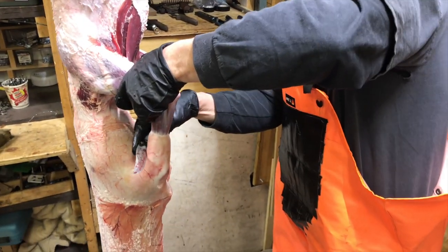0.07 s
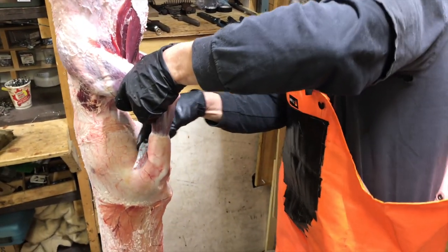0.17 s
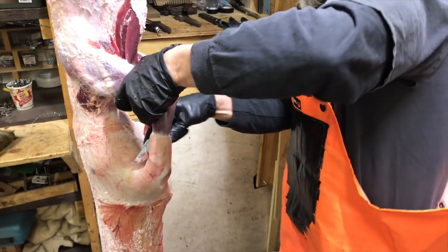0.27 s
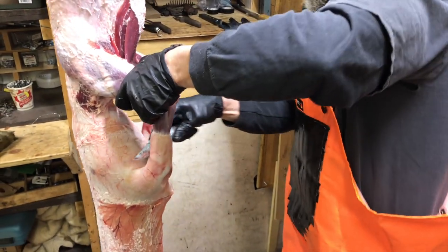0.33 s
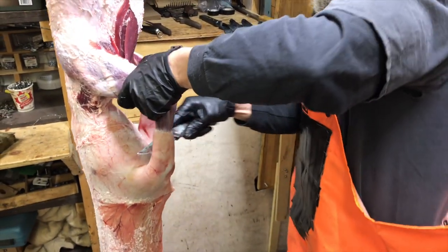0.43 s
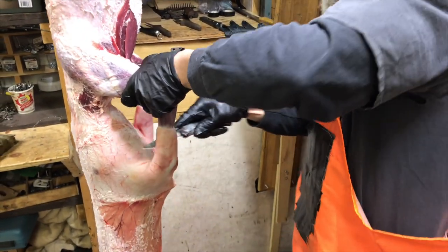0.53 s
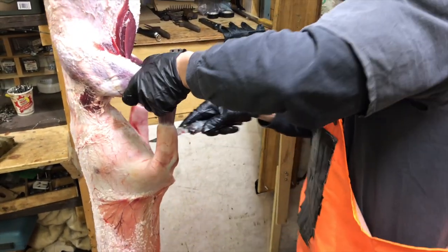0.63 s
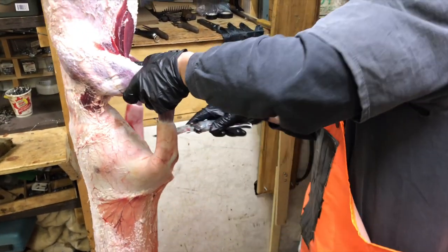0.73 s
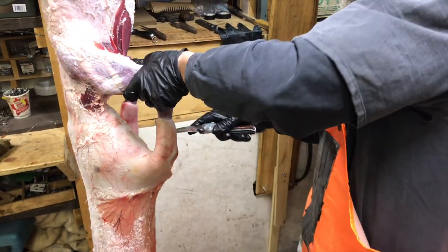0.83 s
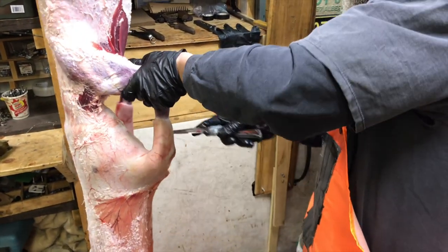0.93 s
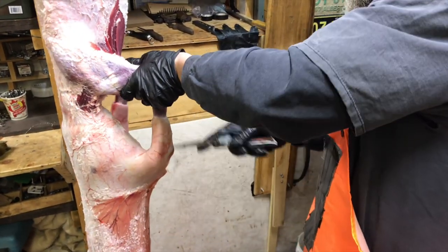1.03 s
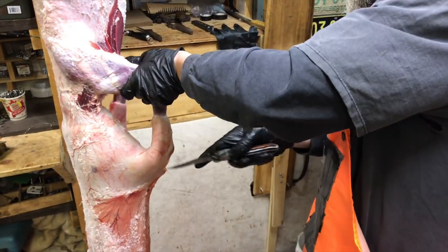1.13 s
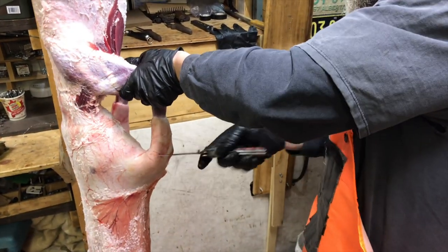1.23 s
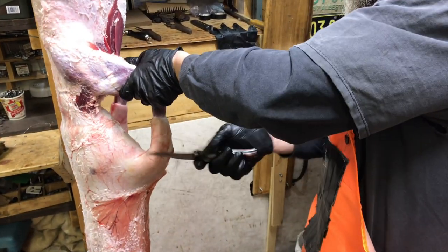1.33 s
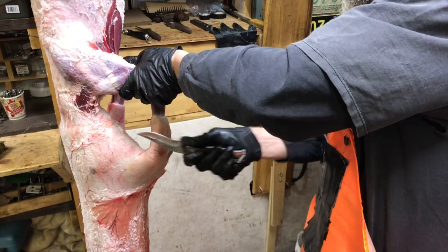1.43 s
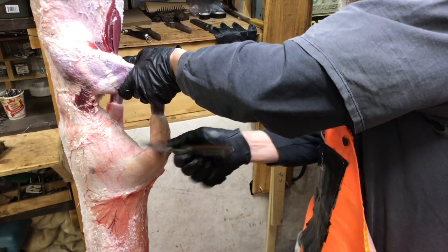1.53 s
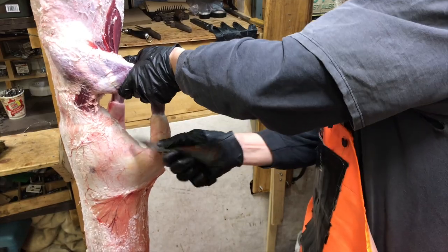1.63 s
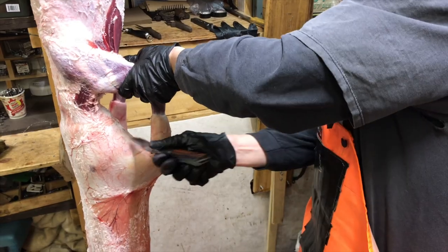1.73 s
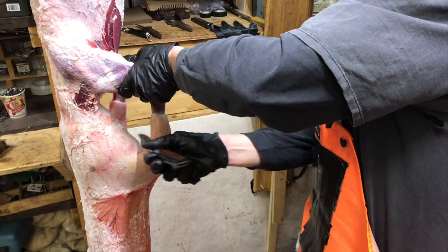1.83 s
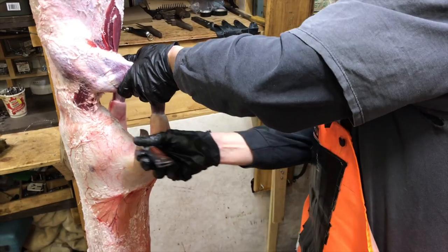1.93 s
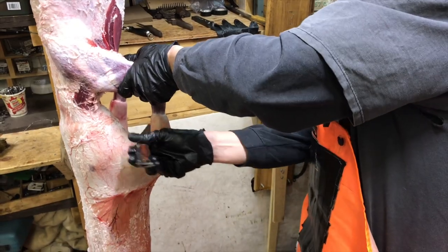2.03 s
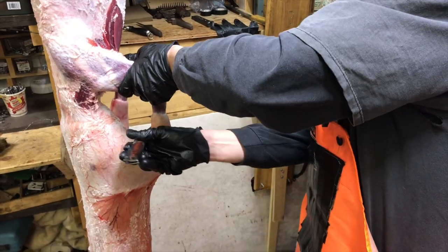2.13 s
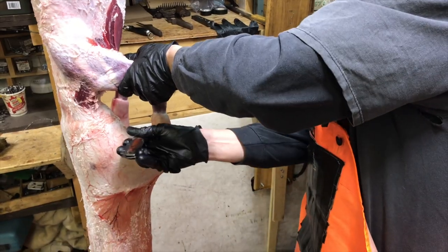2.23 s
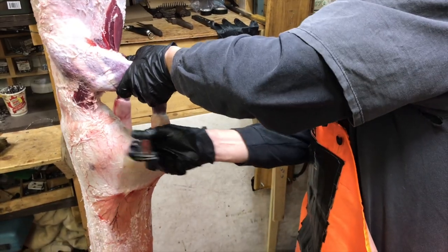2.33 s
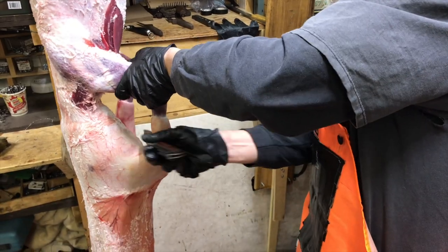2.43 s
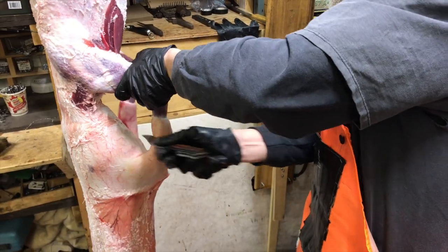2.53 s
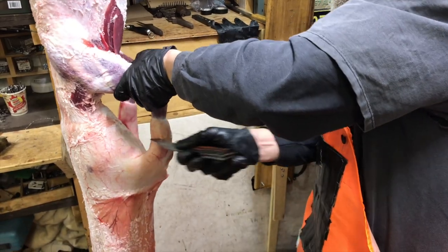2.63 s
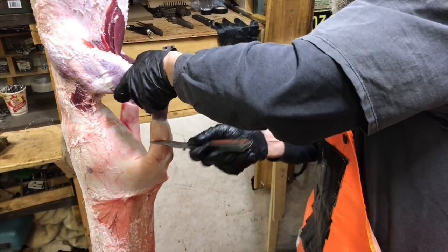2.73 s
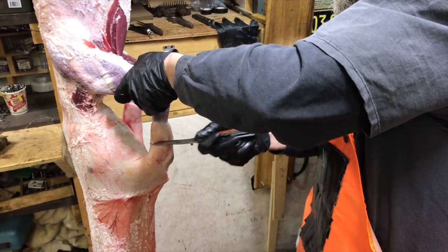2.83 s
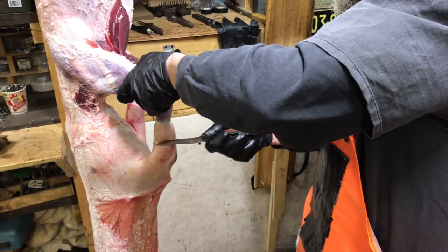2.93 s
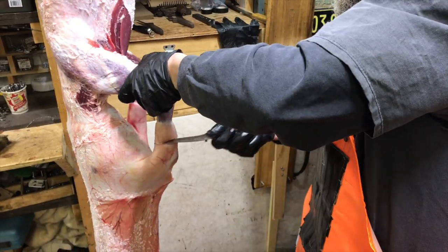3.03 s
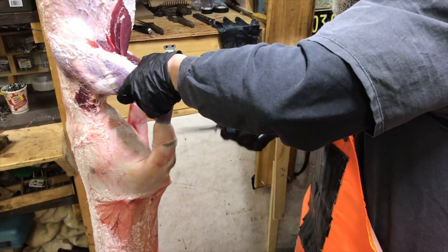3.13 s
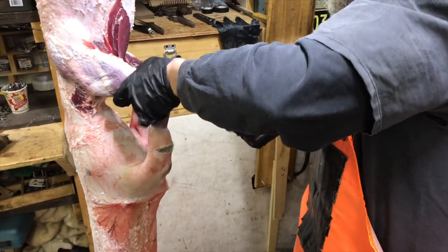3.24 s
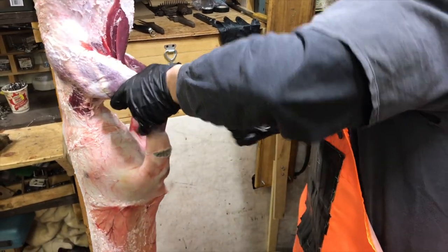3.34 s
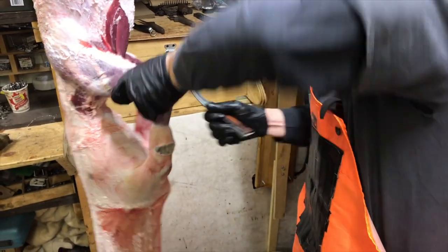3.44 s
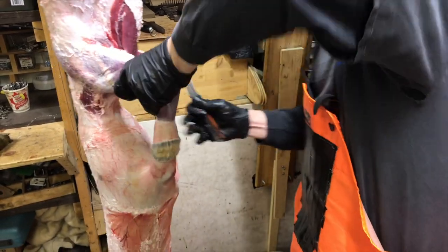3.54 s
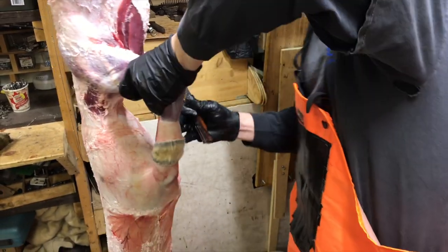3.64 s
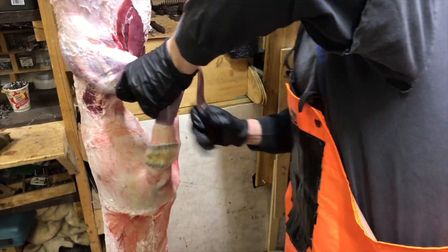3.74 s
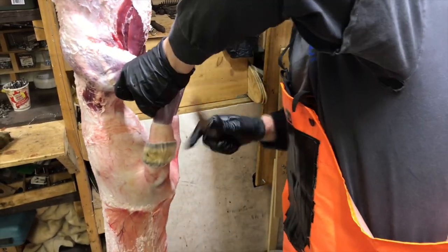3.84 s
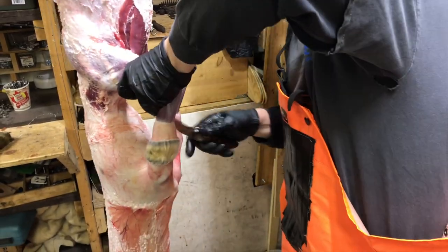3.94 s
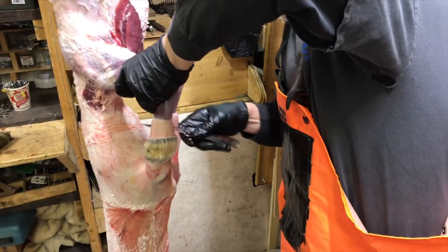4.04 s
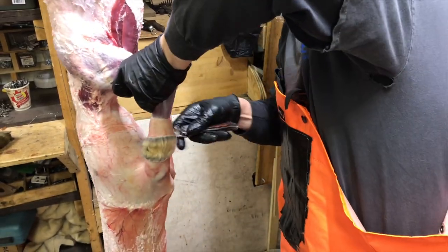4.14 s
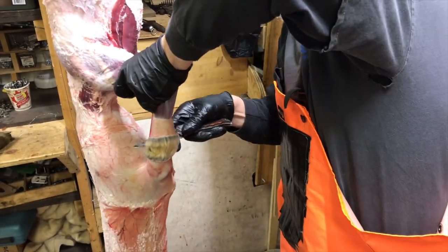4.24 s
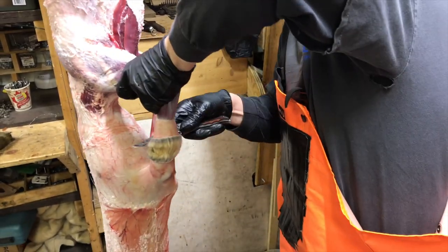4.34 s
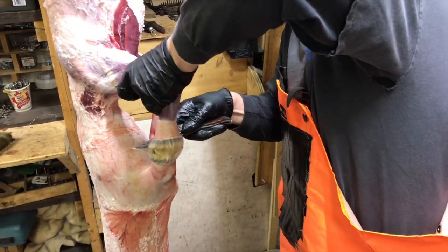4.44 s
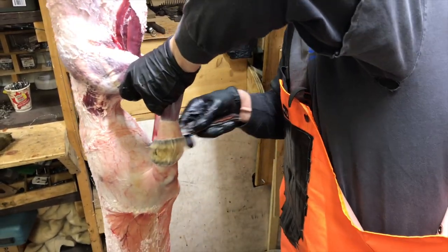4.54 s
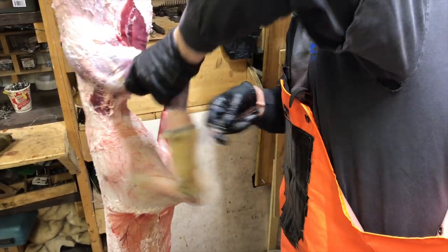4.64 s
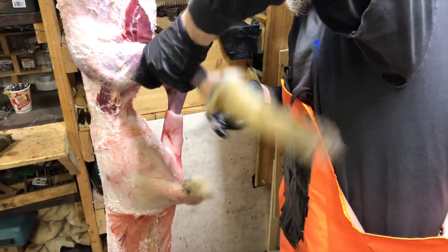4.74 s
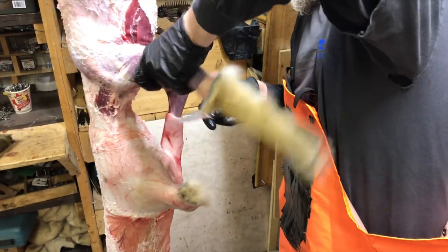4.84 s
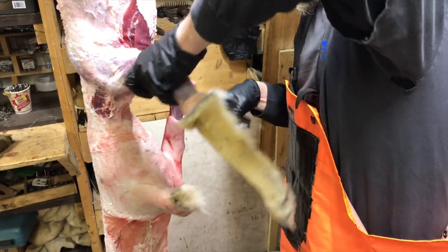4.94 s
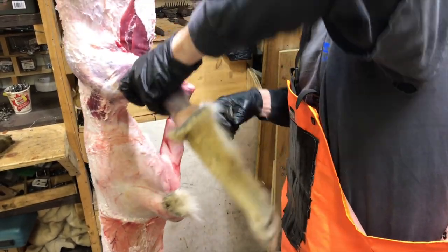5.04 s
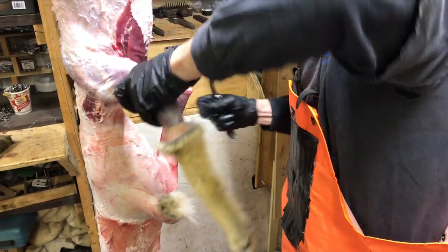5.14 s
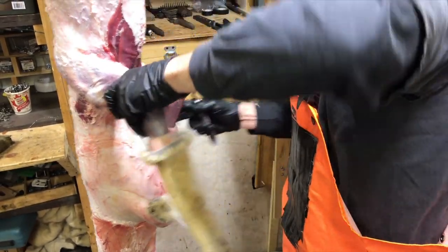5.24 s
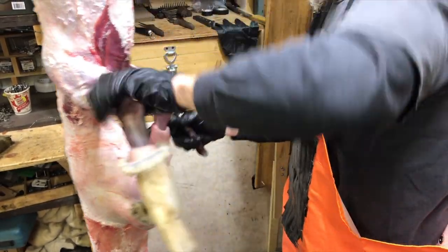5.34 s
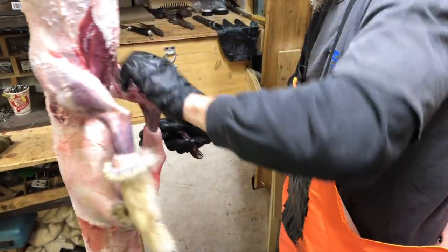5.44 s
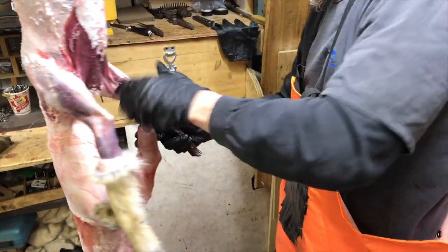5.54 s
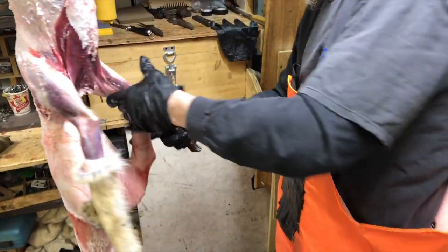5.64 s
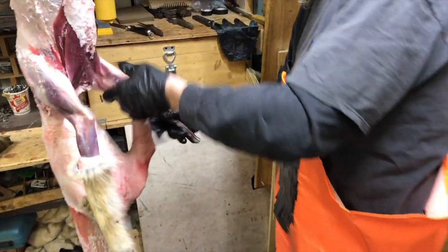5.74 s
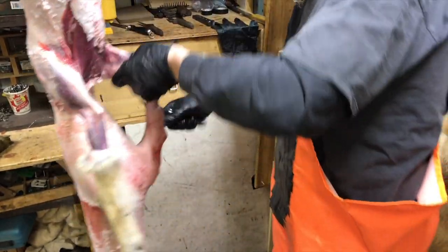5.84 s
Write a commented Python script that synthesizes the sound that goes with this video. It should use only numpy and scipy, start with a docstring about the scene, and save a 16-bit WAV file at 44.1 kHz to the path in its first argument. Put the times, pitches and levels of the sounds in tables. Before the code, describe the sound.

Close view of a hanging carcass being worked in a small workshop. A dull soft crack comes early, then quiet glove slips and faint wet cuts. A short tearing rasp leads to a hard bone snap past the middle, and a second, louder snap follows about a second later with soft meaty thuds. Sleeves rustle to the end over a low hum.

```python
"""In a small workshop with a humming appliance, a hanging carcass has its lower leg cut off at the joint.
The bent joint cracks as damped bone modes and the meat thuds in low, softly pushed modes.
Parting hide and sinew are wet clicks and bursts of coloured grains; the blade sings in narrow-band noise.
Sleeves and gloves rustle as shaped noise. Echoes and a short tail surround the work; the hum stays dry."""
import sys
import numpy as np
from scipy import signal
from scipy.fft import next_fast_len
from scipy.io import wavfile
from scipy.ndimage import uniform_filter1d

SR = 44100
rng = np.random.default_rng(int(sys.argv[2]) if len(sys.argv) > 2 else 0)


def persist_wave(psi):
    """Save psi, clipped to +-1, as 16-bit WAV."""
    counts = np.round(np.clip(psi, -1, 1) * 32767).astype(np.int16)
    wavfile.write(sys.argv[1], SR, np.atleast_2d(counts).T)


N = 259111
T = np.arange(N) / SR

# Joint cracks. Each row: start in seconds, level in dB, snap pitch in Hz, snap rise in seconds,
# leg ring in dB re snap, leg tilt in dB per octave, splinter in dB re snap.
CRACK_EVENTS = [(0.3606, -45, 1520, 0.0028, 4.5, -2.5, -12), (3.4064, -22, 1980, 0.00039, -5, 2, -34),
                (3.4510, -28, 2430, 0.00011, -28, 10, -9), (3.4709, -39.5, 960, 0.00042, -12, -3.5, -16),
                (4.5248, -19, 2450, 0.00014, -7, 1.5, -36)]
# Modes of the leg. Each row: frequency in Hz, rise in seconds, level in dB before tilt.
LEG_MODES = [(278, 0.0018, 1), (375, 0.0018, -16), (678, 0.004, -9), (891, 0.0011, -4.5),
             (1360, 0.0015, -13), (1665, 0.00042, -4.5), (1975, 0.0016, -20), (3580, 0.0006, -15)]


def joint():
    """Each crack is a sharp snap plus the ring of bone, quickly damped by the meat round it."""
    out = np.zeros(N)
    pivot_hz = LEG_MODES[2][0]
    for start_s, level_db, snap_hz, rise_s, leg_db, tilt_db, splinter_db in CRACK_EVENTS:
        leg = 0
        for mode_hz, mode_rise_s, mode_db in LEG_MODES:
            tilted_db = mode_db + tilt_db * np.log2(mode_hz / pivot_hz)
            leg = leg + undb(tilted_db) * ring(mode_hz, mode_rise_s)
        snap = ring(snap_hz, rise_s)
        crack = snap + undb(leg_db) * leg + undb(splinter_db) * splinter(decay_s=0.0005)
        add(out, start_s, -undb(level_db) * crack)  # first push is downward
    return out


def splinter(decay_s):
    """A broad crackle: coloured noise falling by 1/e every decay_s."""
    t = T[:SR // 2]
    spectrum = [(600, -21), (2000, 16.0), (4000, -15), (7000, -5.0), (15000, -16)]  # Hz, dB
    return colour(rng.standard_normal(len(t)), spectrum) * np.exp(-t / decay_s)


# Sinews giving way, and the meat rebounding after. Each row: start in seconds, level in dB, pitch in Hz, swell
# in seconds, carcass sway in dB re thud, bone ring in dB re thud.
THUD_EVENTS = [(0.3616, -30, 193.5, 0.0078, -13.5, -19.5), (0.387, -43.5, 168, 0.014, 0, -7),
               (0.407, -47, 333, 0.0072, -9, -4), (3.562, -44, 170, 0.014, -0.5, -25),
               (3.793, -52, 129.3, 0.033, 1, -17), (4.426, -46, 137, 0.012, -9, -16),
               (4.444, -31, 195, 0.019, -29, -25), (4.525, -42.5, 220, 0.0088, 0, -33),
               (4.587, -34.5, 208, 0.0071, -20, -35)]


def meat(sway_hz=65, sway_rise_s=0.019, boom_db=-7, boom_rise_s=0.075, bone_hz=368, bone_rise_s=0.014):
    """Soft thuds as sinews give and the meat rebounds; each rings the long bone and shakes the carcass, which
    booms on faintly."""
    out = np.zeros(N)
    sway = ring(sway_hz, sway_rise_s, order=2) + undb(boom_db) * ring(sway_hz, boom_rise_s)
    bone = ring(bone_hz, bone_rise_s)
    for start_s, level_db, hz, swell_s, sway_db, bone_db in THUD_EVENTS:
        thud = ring(hz, swell_s, order=3)
        add(out, start_s, undb(level_db) * (thud + undb(sway_db) * sway + undb(bone_db) * bone))
    return out


# Fibres parting under the edge or tearing at the joint. Each row: time of full strength in seconds,
# build in seconds, hold in seconds, fade in seconds, rasp level in dB, fizz in dB re rasp, squelch in dB re rasp.
CUT_EVENTS = [(0.361, 0.00091, .003, 0.029, -59.5, -7, 6.5), (0.888, 0.0065, 0.016, .012, -57.5, -5, 1),
              (0.915, 0.0044, 0.012, 0.012, -54, -3, 2.5), (2.992, 0.019, 0.059, .01, -55, -5, -13),
              (3.053, 0.016, .011, 0.0034, -45.5, -19, -3), (3.407, 0.0036, .003, 0.015, -46.5, -11, 5.5),
              (3.45, .02, 0.016, 0.042, -59, -6, 0.5), (4.53, 0.011, 0.039, 0.023, -48.5, -1.5, -15)]
# Spectra of the coarse rasp, fine fizz and wet squelch. Each row: frequency in Hz, level in dB.
RASP_SPECTRUM = [(100, -10), (250, -3), (800, -7), (1300, -3.5), (1600, -4.5), (2100, -3), (3800, -6.5),
                 (5000, -11.5), (6300, -11.5), (8000, -24), (16000, -21)]
FIZZ_SPECTRUM = [(2000, -13), (4500, -6.5), (6300, -0.5), (7500, -2), (9000, 0.5), (10400, -6),
                 (11700, -2.5), (13500, -0.5), (15500, -2.5)]
SQUELCH_SPECTRUM = [(120, -19), (200, 4), (370, -1), (520, -8), (720, 1.5), (1000, 6), (1300, -2),
                    (2000, -10), (5000, -43)]


def cuts(snag_db=2.0, snag_hz=300):
    """Fibres part in dense grains, snagging on the way: coarse rasp, fine fizz on top, dull wet squelch below."""
    rasp = grains(RASP_SPECTRUM, spread_db=2.2)
    fizz = grains(FIZZ_SPECTRUM, spread_db=2.2)
    squelch = grains(SQUELCH_SPECTRUM, spread_db=2.2)
    power = np.zeros((3, N))
    for full_s, build_s, hold_s, fade_s, rasp_db, fizz_db, squelch_db in CUT_EVENTS:
        layer_db = rasp_db + np.array([[0], [fizz_db], [squelch_db]])
        power += (undb(layer_db) * surge(full_s, build_s, hold_s, fade_s)) ** 2
    coarse, fine, wet = np.sqrt(power)
    return undb(snag_db * walk(snag_hz)) * (coarse * rasp + fine * fizz + wet * squelch)


# Wet clicks of tissue and blade. Each row: start in seconds, level in dB, pitch in Hz, rise in seconds.
TICK_EVENTS = [(0.8830, -52, 2600, 0.0008), (0.9546, -52.5, 2330, 0.00087), (1.2591, -52, 2740, 0.0007),
               (2.3844, -51, 14500, 0.00064), (2.9676, -45.5, 1800, 0.00078), (3.3946, -37.5, 3650, .00015),
               (3.778, -51.5, 2870, 0.003), (3.8455, -52, 2760, 0.0011), (3.929, -54.5, 3600, 0.00092),
               (4.034, -56.5, 2880, 0.0029), (4.4280, -45, 4500, 0.00018), (4.6597, -51, 3000, 0.00033),
               (5.0286, -54.5, 1970, 0.0009)]


def ticks(skirt_db=16, narrowing=0.33, typical_rise_s=.001):
    """Single fibres and wet films let go as tiny gritty bursts; the slower the burst, the clearer its pitch."""
    out = np.zeros(N)
    t = T[:SR // 10]
    for start_s, level_db, hz, rise_s in TICK_EVENTS:
        skirt = skirt_db * (rise_s / typical_rise_s) ** narrowing  # dB down one octave off pitch
        spectrum = [(hz / 2, -skirt), (hz, 0), (hz * 2, -skirt), (hz * 4, -1.5 * skirt)]
        grit = colour(rng.standard_normal(len(t)), spectrum)
        envelope = t / rise_s * np.exp(1 - t / rise_s)
        add(out, start_s, undb(level_db) * grit * envelope)
    return out


# The edge dragging on gristle. Each row: middle in seconds, half length in seconds, level in dB.
DRAG_EVENTS = [(2.49, 0.058, -73), (3.059, .017, -64), (4.528, 0.013, -63)]
# Thin modes of the blade. Each row: frequency in Hz, mean level in dB.
BLADE_MODES = [(9570, -3.5), (11780, 1), (12780, -9)]


def blade(width_hz=150, wander_db=3, wander_hz=30):
    """Friction on gristle feeds the narrow modes of the steel, now one, now another."""
    friction = sum(undb(level_db) * swell(mid_s, half_s) for mid_s, half_s, level_db in DRAG_EVENTS)
    out = np.zeros(N)
    for hz, level_db in BLADE_MODES:
        b, a = signal.iirpeak(hz, hz / width_hz, fs=SR)
        mode = signal.lfilter(b, a, rng.standard_normal(N))
        out += undb(level_db + wander_db * walk(wander_hz)) * unit(mode)
    return friction * out


# Arm movements. Each row: time of full strength in seconds, hold in seconds, level in dB.
ARM_MOVES = [(0.016, .34, -72.5), (0.565, 0.51, -73), (1.093, .52, -69.5), (2.386, 0.18, -70),
             (3.12, 0.27, -72), (3.627, 0.36, -67), (4.46, 0.18, -65), (4.897, 0.31, -69.5),
             (5.228, 0.096, -63), (5.552, 0.26, -67.5)]
MOVE_ATTACK_S, MOVE_RELEASE_S = 0.033, 0.093
REST_DB, SLEEVE_SHEEN_DB = -81, 0.5  # rustle between movements; sheen re rustle
# Slips of glove and blade on the hide. Each row: middle in seconds, half length in seconds,
# level in dB, sheen in dB re level.
SLIP_EVENTS = [(1.188, 0.062, -61, -3), (1.295, 0.013, -67.5, 7), (1.401, 0.029, -62, 6.5),
               (1.475, 0.031, -62.5, 3), (1.593, 0.006, -59, -2), (1.647, 0.022, -61.5, -1),
               (3.164, 0.023, -64.5, -6), (3.388, 0.027, -65, 3), (3.686, 0.02, -64, 2),
               (3.769, 0.0083, -69.5, 16), (3.917, 0.057, -68.5, 9), (5.503, 0.023, -56, -3),
               (5.693, 0.019, -70.5, 10)]
# Spectra of the rub and its treble sheen. Each row: frequency in Hz, level in dB.
RUB_SPECTRUM = [(700, -27), (1500, -2), (2200, -2.5), (3700, 1), (4800, -5), (6600, -1.5), (8000, -8),
                (10000, -11), (16000, -19)]
SHEEN_SPECTRUM = [(5000, -57), (8000, -4.5), (9400, -3), (10400, -6), (11700, 1), (13500, -2.5), (15500, 1)]


def clothes(catch_db=1.25, catch_hz=90, drift_db=0.7, drift_hz=28, crinkle_db=-8):
    """Sleeves rustle as arms move, gloves slip in short strokes; both catch and give off tiny crinkles."""
    sleeve_power = undb(REST_DB) ** 2
    for full_s, hold_s, level_db in ARM_MOVES:
        move = undb(level_db) * surge(full_s, MOVE_ATTACK_S, hold_s, MOVE_RELEASE_S)
        sleeve_power = sleeve_power + move ** 2
    sleeve_power = sleeve_power * undb(drift_db * walk(drift_hz)) ** 2
    rub_power = sleeve_power
    sheen_power = sleeve_power * undb(SLEEVE_SHEEN_DB) ** 2
    for mid_s, half_s, level_db, sheen_db in SLIP_EVENTS:
        slip = swell(mid_s, half_s)
        rub_power = rub_power + (undb(level_db) * slip) ** 2
        sheen_power = sheen_power + (undb(level_db + sheen_db) * slip) ** 2
    grit = grains(RUB_SPECTRUM, spread_db=0.0) + undb(crinkle_db) * crinkles(per_s=30)
    sheen = grains(SHEEN_SPECTRUM, spread_db=2.0)
    return undb(catch_db * walk(catch_hz)) * (np.sqrt(rub_power) * grit + np.sqrt(sheen_power) * sheen)


def crinkles(per_s, decay_s=0.0012):
    """Stray little clicks of rubber and cloth: decaying noise bursts at random moments; rms 1."""
    pops = (rng.random(N) < per_s / SR).astype(float)
    bursts = signal.lfilter([1], [1, -np.exp(-1 / (decay_s * SR))], pops)
    return unit(bursts * noise(RUB_SPECTRUM))


# Close reflections off bench, floor and wall. Each row: delay in seconds, level in dB.
CLOSE_ECHOES = [(.0062, -18), (.0083, -22), (0.0134, -20)]
# Diffuse tail. Each row: lowest Hz, highest Hz, 60 dB decay time in seconds, gain in dB on band-filtered noise.
TAIL_BANDS = [(40.7, 138, 1, -9), (106, 510, 0.3, -6), (510, 2600, 0.28, -10.5), (2620, 20000, 0.18, -11.5)]


def room(x, build_s=0.0034):
    """A few close echoes, then a short diffuse tail; the bass booms on longest."""
    t = T[:SR]
    response = np.zeros(len(t))
    for low_hz, high_hz, t60_s, gain_db in TAIL_BANDS:
        band = signal.butter(2, [low_hz, high_hz], "band", fs=SR, output="sos")
        wash = signal.sosfilt(band, rng.standard_normal(len(t)))
        fade = np.exp(-np.log(1000) * t / t60_s) * np.minimum(t / build_s, 1) ** 2
        response += undb(gain_db) * wash * fade / np.linalg.norm(fade)
    response[0] = 1  # direct sound
    for delay_s, level_db in CLOSE_ECHOES:
        response[int(delay_s * SR)] += undb(level_db)
    return signal.fftconvolve(x, response)[:N]


# Hum lines. Each row: frequency in Hz, level in dB, waver as a share of the steady tone.
HUM_LINES = [(59.2, -65, 0.4), (90.5, -60, 0.19), (182.6, -70.5, .4), (267.6, -62, 0.15), (953, -82, 0.27)]
# Spectrum of the still air. Each row: frequency in Hz, level in dB.
AIR_SPECTRUM = [(20, -34), (40, -5.5), (60, -0.5), (85, 1.5), (110, -1), (190, -6.5), (280, -1),
                (480, -12.5), (1000, -13.5), (2000, -22.5), (4500, -30.5), (10400, -37.5), (15500, -30)]
AIR_DB = -57.5


def workshop():
    """A motor hums on a few wavering lines over the still air."""
    hum = np.zeros(N)
    for hz, level_db, waver in HUM_LINES:
        wobble = 1 + waver * (walk(4.966) + 1j * walk(3.35))  # wavers in level and phase
        hum += undb(level_db) * unit(np.real(wobble * np.exp(2j * np.pi * hz * T)))
    return hum + undb(AIR_DB) * noise(AIR_SPECTRUM)


def undb(db):
    """Decibels to gain."""
    return 10 ** (np.asarray(db) / 20)


def unit(x):
    """Scale to rms 1."""
    return x / np.sqrt(np.mean(x ** 2))


def colour(x, points):
    """Filter by (Hz, dB) points, joined in dB over log frequency; rms 1."""
    hz, db = np.transpose(points)
    f = np.maximum(np.fft.rfftfreq(len(x), 1 / SR), 1)
    gain = undb(np.interp(np.log(f), np.log(hz), db))
    return unit(np.fft.irfft(np.fft.rfft(x) * gain, len(x)))


def noise(points):
    """Smooth noise of a given colour."""
    return colour(rng.standard_normal(next_fast_len(N)), points)[:N]


def grains(points, spread_db):
    """Coloured noise in 24-sample grains of uneven level; a spread of 0 leaves it smooth."""
    size = next_fast_len(N)
    strength = np.repeat(np.minimum(rng.exponential(size=size), 3), 24)[:size]
    return colour(rng.standard_normal(size) * undb(spread_db * strength), points)[:N]


def walk(rate_hz):
    """Slow chance: random steps at rate_hz, smoothed over one step; rms 1."""
    k = int(SR / rate_hz)
    steps = np.repeat(rng.standard_normal(N // k + 2), k)
    return unit(uniform_filter1d(steps, k)[:N])


def ring(hz, rise_s, order=1):
    """A damped mode whose envelope peaks at 1 after rise_s; a higher order is a softer push."""
    t = T[:SR // 2]
    envelope = (t / rise_s * np.exp(1 - t / rise_s)) ** order
    return envelope * np.sin(2 * np.pi * hz * t)


def swell(mid_s, half_s):
    """A smooth rise and fall round mid_s."""
    return np.exp(-np.minimum(((T - mid_s) / half_s) ** 2, 20))


def surge(full_s, attack_s, hold_s, release_s):
    """Build up exponentially to full strength at full_s, hold, then die away."""
    before = np.maximum((full_s - T) / attack_s, 0)
    after = np.maximum((T - full_s - hold_s) / release_s, 0)
    return np.exp(-np.minimum(before + after, 20))


def add(track, start_s, sound):
    """Mix a sound in at start_s."""
    i = int(start_s * SR)
    track[i:i + len(sound)] += sound[:N - i]


def scene():
    """The work at the carcass, heard in the room over its hum."""
    work = joint() + meat() + cuts() + ticks() + blade() + clothes()
    return (room(work) + workshop())[None]


def record(dry, top_hz=15850):
    """A steep elliptic low-pass cuts the top."""
    return signal.sosfilt(signal.ellip(10, .2, 70, top_hz, fs=SR, output="sos"), dry)


dry = scene()
out = record(dry)
persist_wave(out)
```